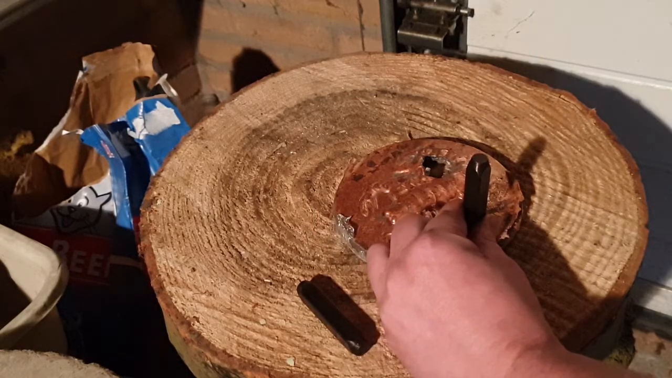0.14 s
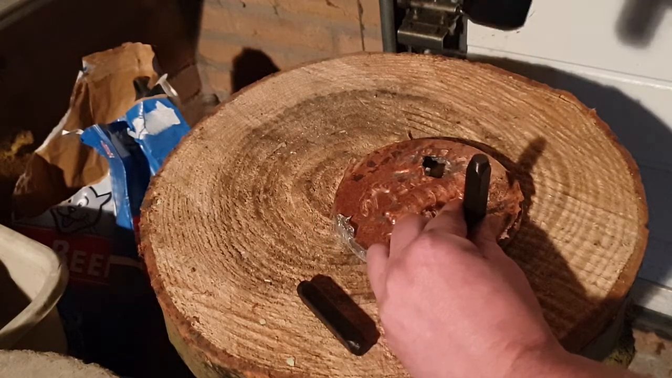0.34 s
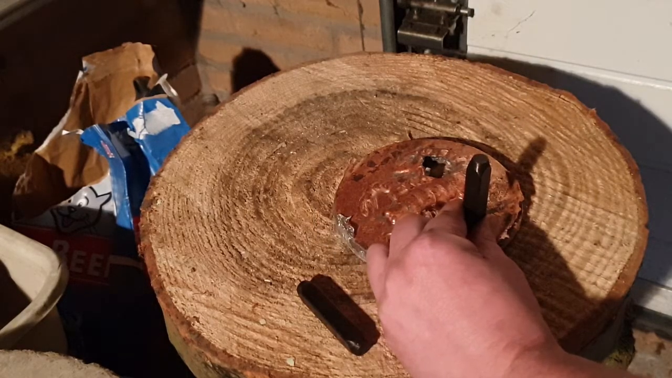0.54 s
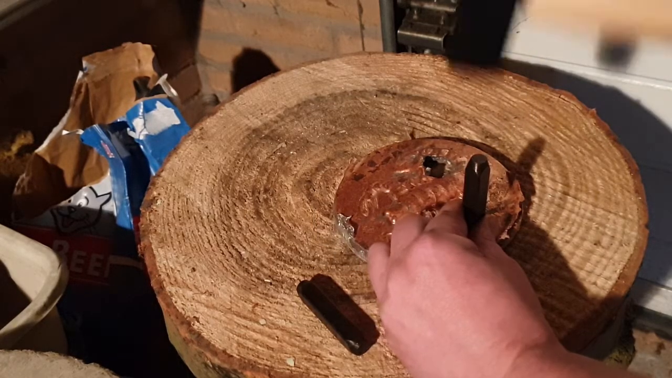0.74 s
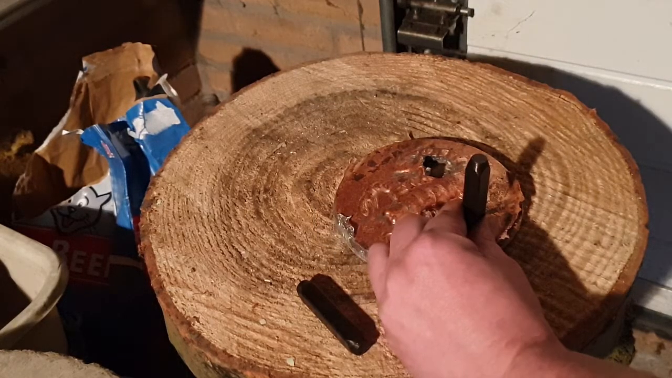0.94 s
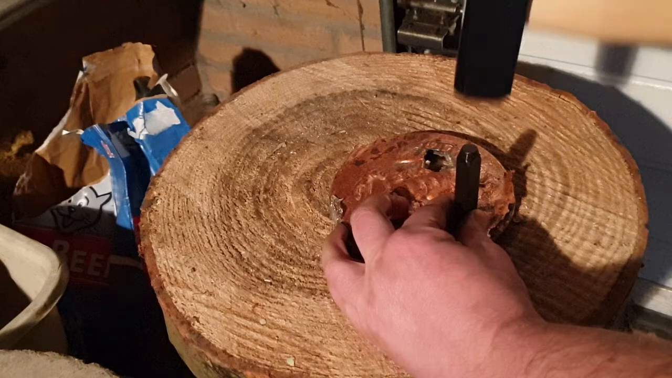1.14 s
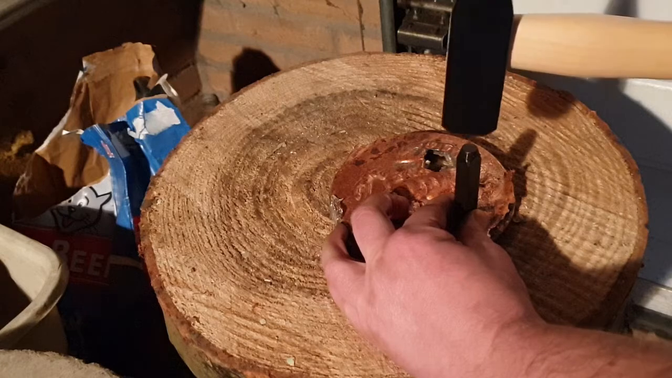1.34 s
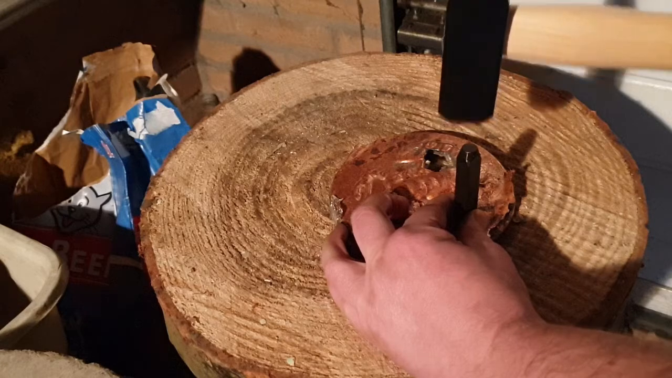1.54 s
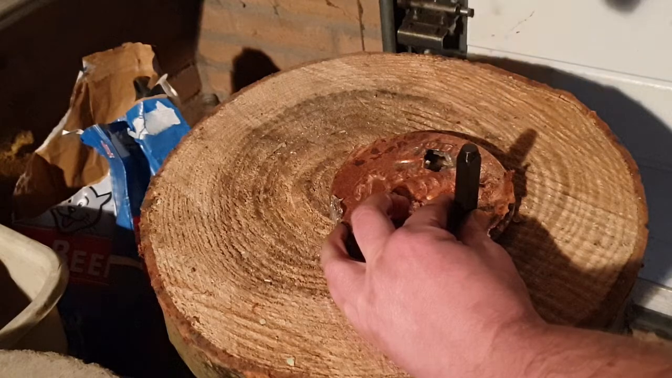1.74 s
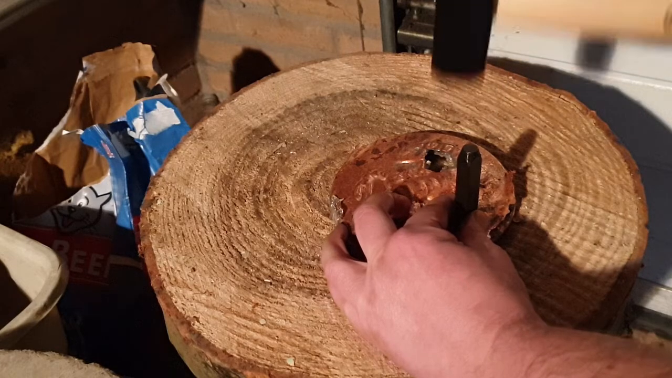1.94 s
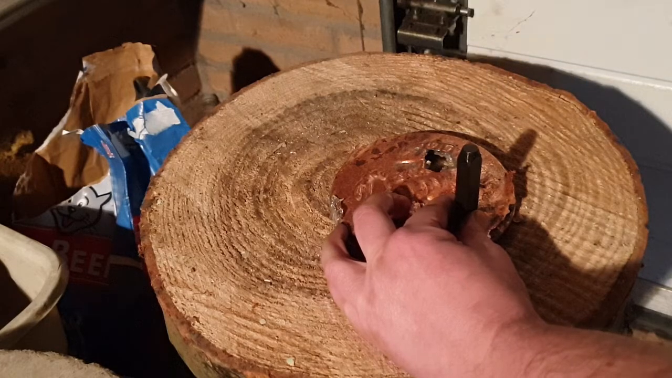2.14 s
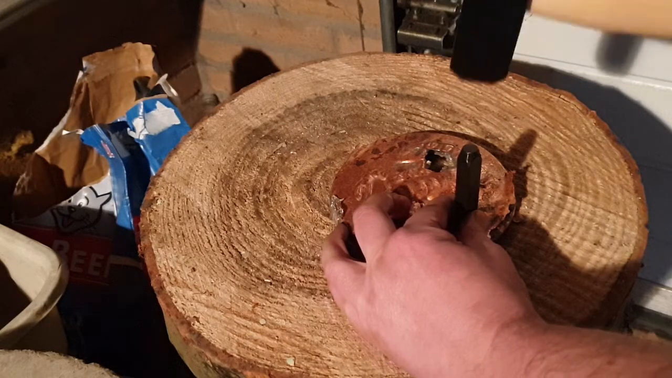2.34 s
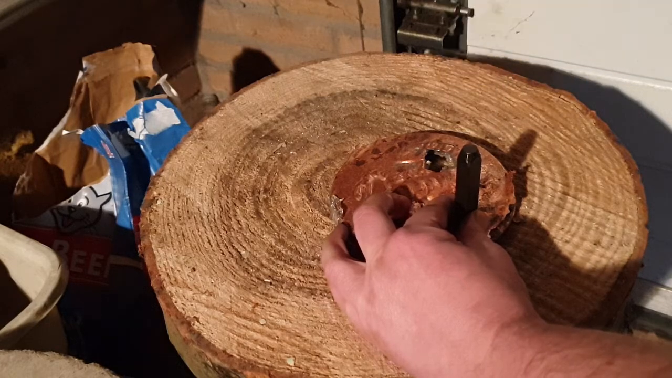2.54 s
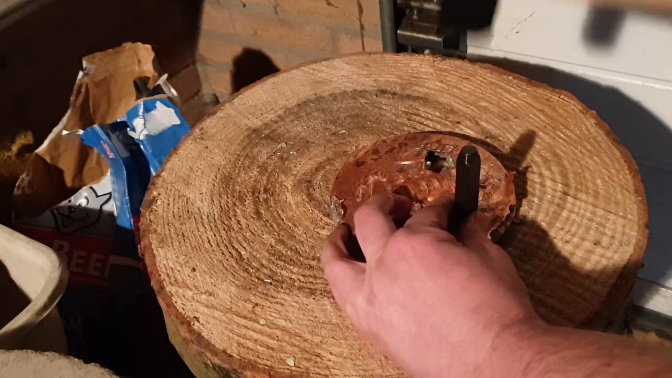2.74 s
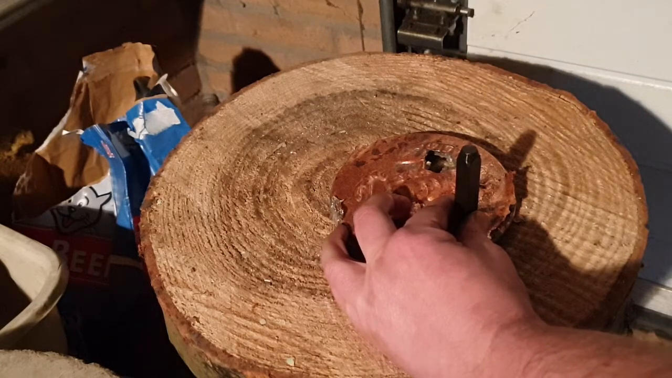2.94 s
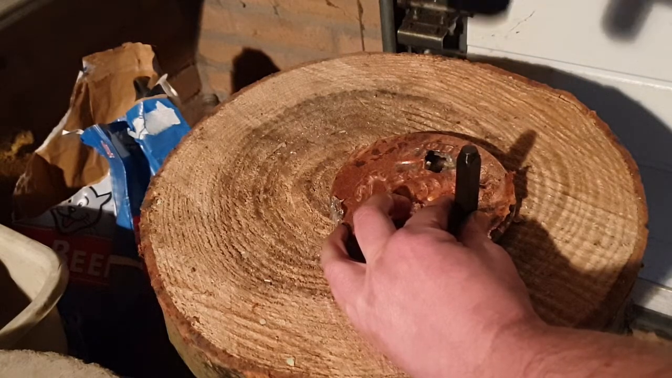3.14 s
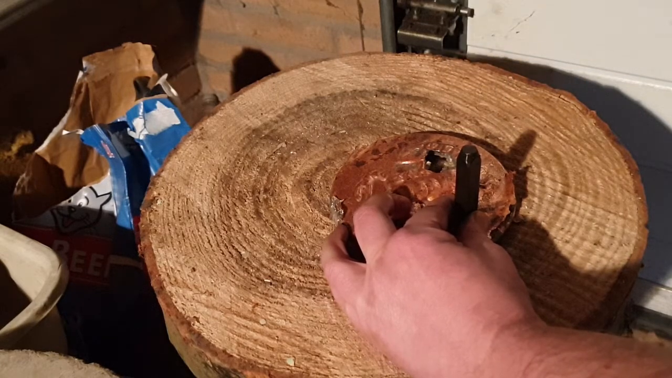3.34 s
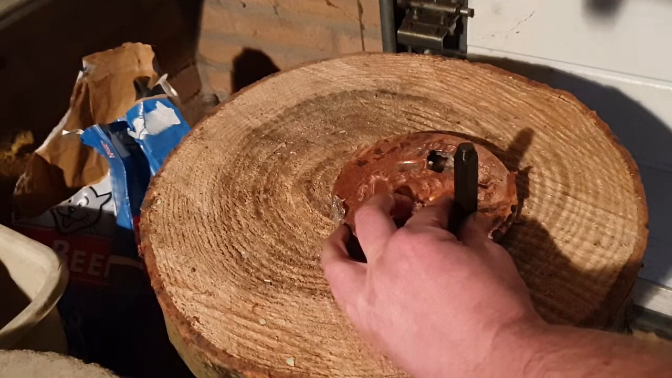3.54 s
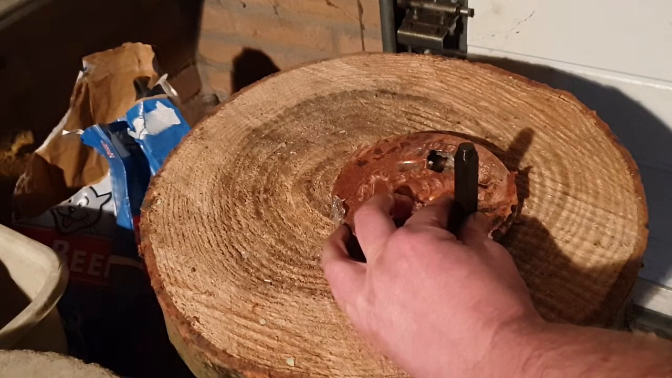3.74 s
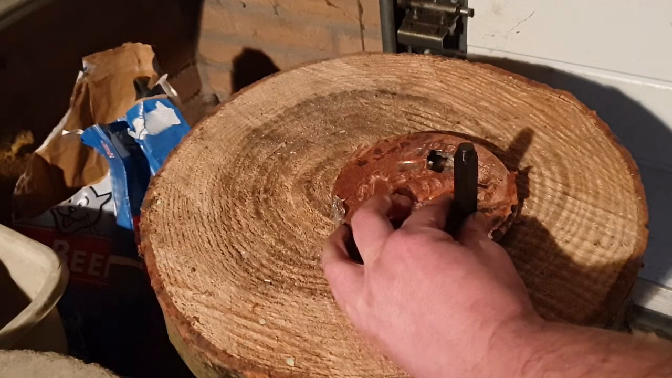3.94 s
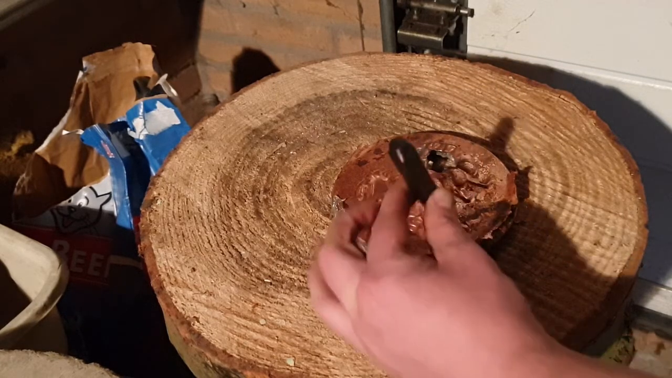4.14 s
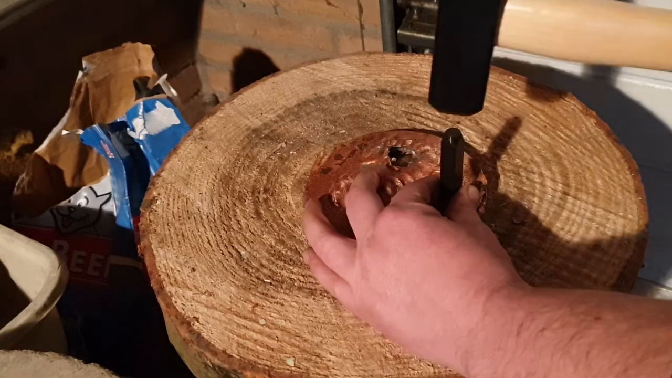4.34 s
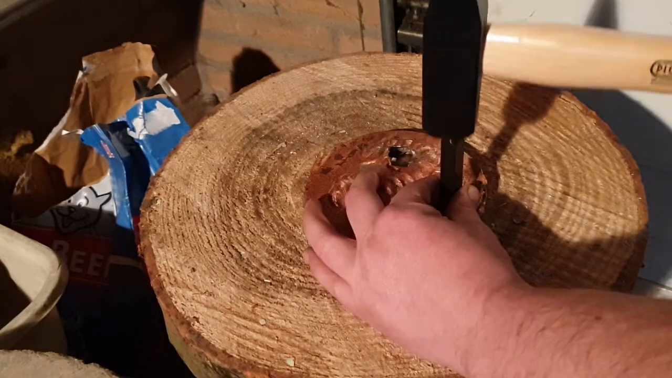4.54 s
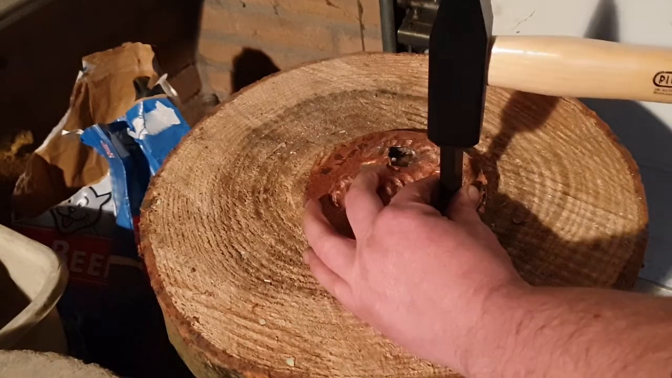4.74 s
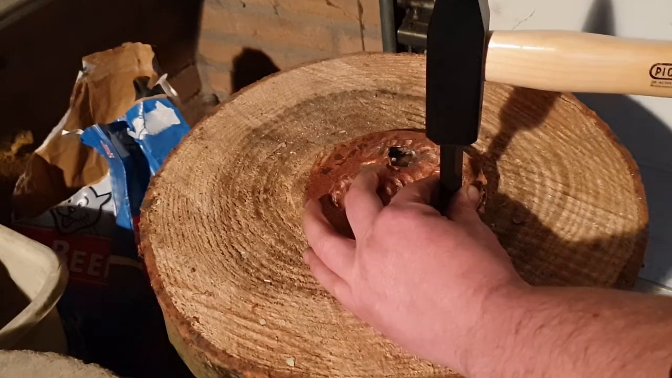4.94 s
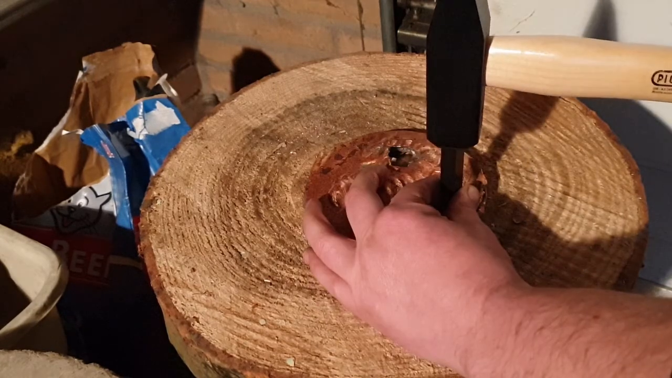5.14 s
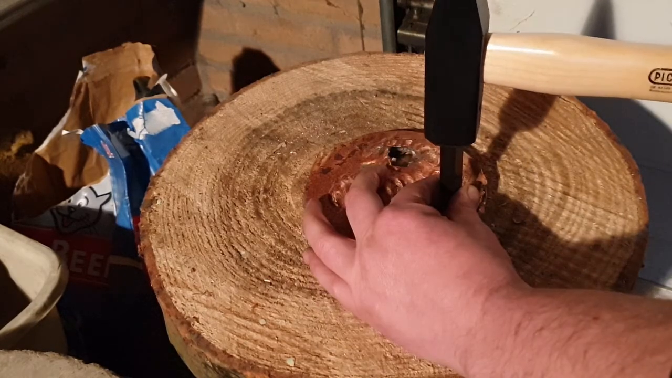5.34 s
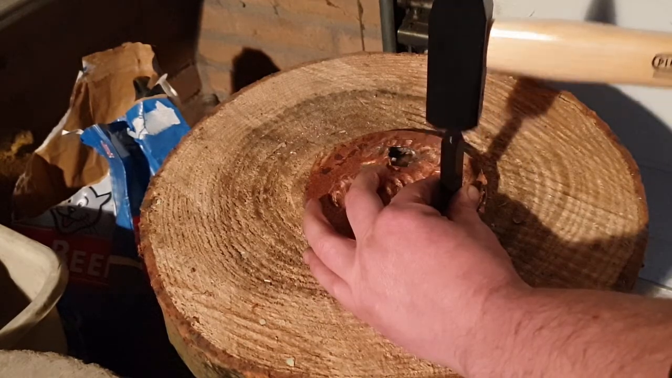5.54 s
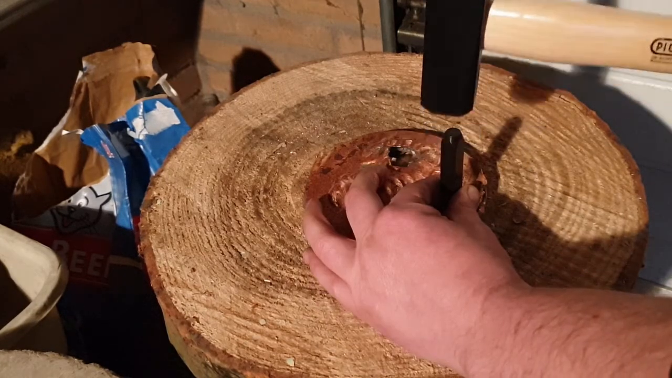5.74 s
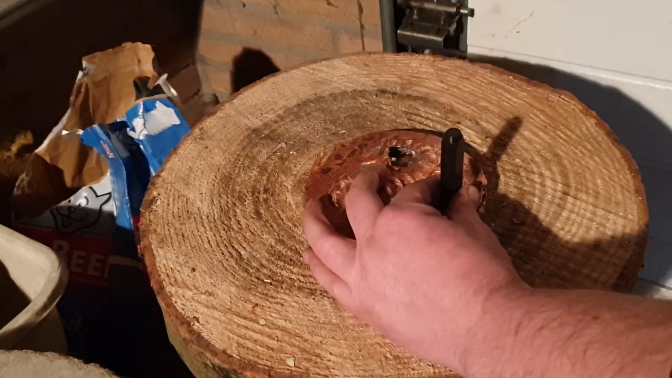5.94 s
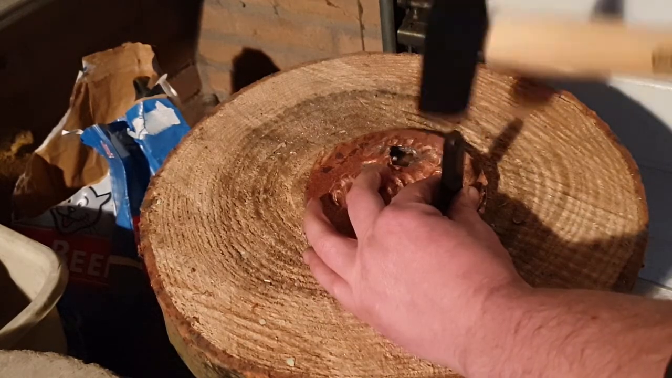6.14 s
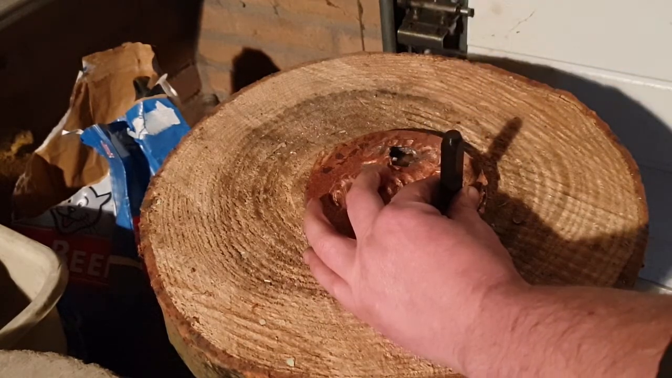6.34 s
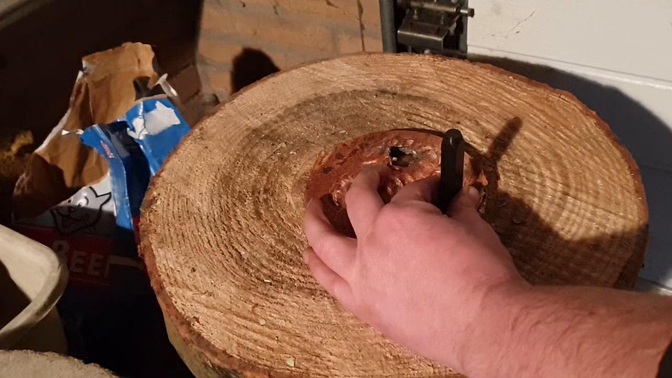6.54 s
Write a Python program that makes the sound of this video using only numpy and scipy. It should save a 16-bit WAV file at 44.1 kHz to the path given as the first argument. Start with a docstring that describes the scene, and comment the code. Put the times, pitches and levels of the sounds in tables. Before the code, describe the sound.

A hammer cracks sharply on a hand-held steel stamp over metal and wood, six spaced blows in a small workshop, with light rubbing between.

```python
"""In a small workshop, a hammer drives a hand-held steel stamp into a metal disc lying on a tree stump.
Each blow is a hard click for the crack, dying tones for the steel and the block, and a low thump;
dense, fading noise makes the echoes of the close walls.
Between blows the hand shifts the work: shaped noise makes the rubs, short clicks the ticks and knocks,
and a few dying tones a last clink. Quiet noise is the still air."""
import sys
import numpy as np
from scipy import signal
from scipy.fft import rfft, irfft
from scipy.io import wavfile
from scipy.ndimage import uniform_filter1d

SR = 44100
rng = np.random.default_rng(int(sys.argv[2]) if len(sys.argv) > 2 else 0)


def dump(signal):
    """Clip the signal to [-1, 1] and save it as 16-bit WAV at the path in sys.argv[1]."""
    limited = np.clip(np.atleast_2d(signal).T, -1, 1)
    pcm = np.round(limited * 32767).astype(np.int16)
    wavfile.write(sys.argv[1], SR, pcm)


N = 294147

# Hammer blows; the first is already dying away, and the light one is followed by its bounce:
# (time [s], force [dB], treble [dB], low ring [dB], middle ring [dB], thump pitch [Hz])
BLOWS = [(-0.126, 13, 0, -6.5, 1.5, 57.9), (0.7829, 10, -3.5, -10, 0, 56), (1.95, 11, -5.5, 0.5, -6.5, 92),
         (2.7395, 13, -3.5, -1, -1, 78.8), (3.53, 12, -3, 0.5, 4.5, 70.2), (4.6946, 8, -9, -31, -10, 123.4),
         (4.729, -3.5, -34, -32, -33, 168), (6.2168, 10.5, -2, -7.5, 3, 92.83)]
# Colour of the crack of steel on steel: (frequency [Hz], relative level [dB per Hz])
CRACK_COLOUR = [(30, -26), (85, 5), (170, -2.5), (400, -2), (700, -2.5), (1050, -0.5), (1600, -1.5),
                (2400, -1.5), (4200, -1), (6200, -9.5), (8500, -7.5), (11500, 0.5), (14000, -0.5),
                (16000, -19)]
# Colour of the disc slapping the wood, damped at once: (frequency [Hz], relative level [dB per Hz])
DISC_COLOUR = [(60, -28), (400, -20.5), (700, -7.5), (930, 4.5), (1200, -3.5), (1500, -4), (2000, -8),
               (2600, -21.5), (3300, -9.5), (4200, -29.5), (8000, -41.5), (16000, -58)]
# Modes (natural tones) of stamp and hammer head: low ring, middle ring, then the high ones: (frequency [Hz])
STEEL_HZ = [2528, 5288, 6600, 6750, 7740, 8600, 8885, 10490, 10700, 11700, 11920, 12070, 13300, 13770]
# Those modes, damped by the fingers: (relative strength [dB], time to fall by 60 dB [s])
STEEL_MODES = [(-7, 0.081), (-10, 0.083), (-21, 0.051), (-21.5, 0.022), (-21, 0.095), (-21, 0.064),
               (-15.5, 0.013), (-18.5, 0.044), (-15, 0.023), (-18, .025), (-21, 0.048), (-21.5, 0.045),
               (-25.5, .025), (-28, .035)]
# Modes of the block, the disc on it and the low notes of the room: (frequency [Hz])
BLOCK_HZ = [54, 76, 91, 137, 204, 232, 307, 516, 571, 603, 897, 973, 1047, 1115, 1217, 1646, 1982]
# Those modes: (relative strength [dB], time to fall by 60 dB [s])
BLOCK_MODES = [(-4.5, 0.58), (-5.5, 0.59), (-4, 0.1), (-3, 0.31), (-6, 0.3), (-2, .41), (-6.5, 0.2),
               (-6, 0.18), (-20, 0.57), (-0.5, 0.16), (-6, 0.21), (-2, 0.16), (-4, 0.17), (-2, .26),
               (-5.5, 0.31), (-1.5, .2), (-7.5, 0.29)]

# A blow is full from FULL_DB of force upwards and a mere tap from TAP_DB downwards.
FULL_DB, TAP_DB = 9, 7.5
# Slap of the disc, relative to the crack: (full blow [dB], tap [dB])
DISC_SLAP_DB = (-13.5, 1)
# Strength of the high steel modes: (full blow [dB], tap [dB])
HIGH_RING_DB = (2, 0)
# Strength of the ringing block: (full blow [dB], tap [dB])
BLOCK_RING_DB = (-5, -14)
# Strength of the wall echoes: (full blow [dB], tap [dB])
ECHO_DB = (7, -5.5)
# Thump level at THUMP_HZ, the same whatever the force of the blow, and its change per octave upwards
THUMP_DB, THUMP_HZ, THUMP_DB_PER_OCTAVE = 4.5, 80, -10

# Pushes of the hand on the work, all levels relative:
# (start [s], length [s], pressure [dB], top sliding speed [dB], rocking of the block [dB])
PUSHES = [(1.102, 0.21, 0, 0.5, -6), (1.314, 0.38, -4, -13, 0), (1.62, 0.6, -3.5, -12, -3.5),
          (4.15, 0.32, -26, -6.5, -27), (4.301, 0.052, -9, -7, 1.5), (4.396, 0.27, -7.5, -0.5, 6),
          (4.924, 0.25, -9, -9, -8), (5.142, 0.28, -11.5, -4.5, -5.5), (5.379, 0.51, -6.5, -5.5, -2.5),
          (5.778, 0.59, -8.5, -6.5, -2), (5.857, 0.22, -3, -3.5, -27)]
PUSH_RISE_S, PUSH_FADE_S = 0.023, 0.029
SCUFF_PER_PRESSURE, SCUFF_PER_SPEED = 2.4, 0.17  # dB of scuffing per dB of each
# Colour of the rocking block: (frequency [Hz], relative level [dB per Hz])
ROCKING_COLOUR = [(20, -10.5), (55, 6), (85, 0), (130, -14.5), (250, -48.5)]
# Colour of rubbing skin: (frequency [Hz], relative level [dB per Hz])
RUBBING_COLOUR = [(70, -22.5), (150, 5), (210, 5.5), (300, 1), (420, -16.5), (900, -43)]
# Colour of scuffing wood: (frequency [Hz], relative level [dB per Hz])
SCUFFING_COLOUR = [(200, -17.5), (340, 2), (490, -3.5), (600, -6.5), (800, -29), (1500, -47)]
# Colour of scraping grit: (frequency [Hz], relative level [dB per Hz])
SCRAPING_COLOUR = [(300, -18.5), (600, 3), (850, 1), (1200, -4.5), (1800, -7.5), (2600, -11.5),
                   (6500, -22.5), (9500, -16), (15000, -17.5)]

# The stamp's tip catching hard on the disc: (time [s], level before a shared lift [dB])
TICKS = [(1.466, -59.5), (1.687, -53.5), (5.224, -61.5), (5.26, -59.5), (5.759, -58), (5.899, -53),
         (5.92, -54)]
# Colour of such a tick: (frequency [Hz], relative level [dB per Hz])
TICK_COLOUR = [(100, 4), (500, 14), (1200, -2.5), (2500, -6), (6000, -15.5), (10000, -23), (15000, -28)]
# Chance catches while the hand pushes: how often, and their typical level at full pressure
CATCHES_PER_S, CATCH_DB = 16, -47
# Soft knocks of the disc settling: (time [s], level [dB])
KNOCKS = [(0.3735, -31.5), (0.387, -47)]
# Colour of such a knock: (frequency [Hz], relative level [dB per Hz])
KNOCK_COLOUR = [(30, -5.5), (90, 1.5), (200, -7), (500, -18), (1500, -29), (3500, -37.5), (8000, -53)]
# A last small clink of steel: its time and level, then its modes
CLINK_S, CLINK_DB = 6.643, -47.5
# (frequency [Hz], relative strength [dB], time to fall by 60 dB [s])
CLINK_MODES = [(1270, -7, 0.024), (2410, -8.5, 0.043), (4270, 6.5, 0.058), (6930, 1, 0.037),
               (10850, 0.5, .04), (12100, 5, .04)]

# How long the echoes last: (frequency [Hz], time to fall by 60 dB [s])
ROOM_DECAY = [(60, 0.49), (120, 0.56), (250, 0.39), (500, 0.3), (1000, 0.29), (2500, 0.28), (5000, .25),
              (8000, .225), (14000, 0.15)]
# How alike the two microphones hear a sound: (frequency [Hz], likeness [1 = identical])
LIKENESS = [(30, 0.97), (130, 0.93), (300, 1), (600, 0.47), (1200, 0.027), (3000, 0.31), (15000, 0.2)]
# Bands of the blows heard more on one side: (frequency [Hz], left minus right [dB])
LEAN = [(40, 1), (90, -0.5), (160, 1), (270, -2), (500, -1.5), (1200, 1.5), (2500, -1), (5200, 3),
        (8800, 1.5), (12000, -1)]
# Colour of the still workshop air: (frequency [Hz], relative level [dB per Hz])
AIR_COLOUR = [(20, -22), (40, -1.5), (60, 1), (100, -13), (200, -22), (400, -30), (1000, -38.5),
              (2500, -47.5), (7000, -55.5), (13000, -45.5), (16000, -50)]
AIR_DB = -67.5
EDGE_HZ = 16400  # upper limit of the microphones


def hammer(walls, near_db=-2, near_ring_db=-8, moved=0.29):
    """A blow cracks, rings the steel and thuds the block; a tap gets more of the disc's slap."""
    out = np.zeros((2, N))
    block_ring = block()
    for time_s, force_db, treble_db, low_db, middle_db, thump_hz in BLOWS:
        lightness = np.clip((FULL_DB - force_db) / (FULL_DB - TAP_DB), 0, 1)
        slap_db, high_db, block_db, echo_db = (
            full + lightness * (tap - full)
            for full, tap in (DISC_SLAP_DB, HIGH_RING_DB, BLOCK_RING_DB, ECHO_DB))
        thump_db = THUMP_DB + THUMP_DB_PER_OCTAVE * np.log2(thump_hz / THUMP_HZ)

        rings = steel(low_db, middle_db, high_db)
        crack = click(CRACK_COLOUR, treble_db) + amp(slap_db) * click(DISC_COLOUR)
        crack = np.pad(crack, (0, SR - len(crack)))

        # the moving arm changes part of the echoes
        echoes = np.sqrt(1 - moved) * walls + np.sqrt(moved) * reflections()
        # the upright stamp rings sideways, so its tone comes mostly by way of the walls
        near_source = crack + amp(near_ring_db) * rings
        near = signal.fftconvolve(near_source[None], near_path(), axes=1)
        far = signal.fftconvolve((crack + rings)[None], room(echoes), axes=1)

        sound = (amp(near_db) * near + amp(echo_db) * far)[:, :SR]
        sound = sound + amp(block_db) * block_ring
        add(out, time_s, amp(force_db) * sound + amp(force_db * 0 + thump_db) * thump(thump_hz))
    return out


def click(colour, treble_db=0, corner_hz=2000, top_hz=13000, size=4096):
    """A hit as a click that starts at once; softer, longer contact loses treble, most at the top."""
    hz = abs(np.fft.fftfreq(size, 1 / SR))
    above_corner = hz ** 4 / (hz ** 4 + corner_hz ** 4)
    very_top = np.minimum(hz / top_hz, 1) ** 8
    gain = evened(amp(read(colour, hz))) * amp(treble_db * (above_corner + very_top))
    # minimum phase: the energy comes as early as this colour allows
    return np.fft.ifft(np.exp(np.conj(signal.hilbert(np.log(gain))))).real


def steel(low_db, middle_db, high_db, detune=0.0006, split=0.0019):
    """Grip and contact set how strongly modes speak; steel bends two ways, so each is a beating pair."""
    count = len(STEEL_MODES)
    group_db = [low_db, middle_db] + [high_db] * (count - 2)
    drift, turns = rng.standard_normal(count), rng.random(count)
    out = np.zeros(SR)
    for hz, (db, t60), extra_db, shift, turn in zip(STEEL_HZ, STEEL_MODES, group_db, drift, turns):
        for way in (-1, 1):
            mode_hz = hz * (1 + detune * shift + way * split)
            out += amp(db + extra_db) * ring(mode_hz, t60, 2 * np.pi * turn) / 2
    return out


def block(swell_s=0.016):
    """The block's modes swell just after the blow and reach each microphone in their own phase."""
    out = np.zeros((2, SR))
    for hz, (db, t60), turn in zip(BLOCK_HZ, BLOCK_MODES, rng.random(len(BLOCK_MODES))):
        apart = np.arccos(likeness(hz)) / 2 * rng.choice([-1, 1])
        pair = [ring(hz, t60, 2 * np.pi * turn + side * apart) for side in (-1, 1)]
        out += amp(db) * np.array(pair)
    return out * (1 - np.exp(-np.arange(SR) / SR / swell_s))


def thump(hz, t60=0.2, apart_hz=62):
    """The whole block dips on the floor; a deeper thump puts the two microphones more out of step."""
    apart = np.minimum(apart_hz / hz, 1) ** 2
    pair = np.array([ring(hz, t60, np.pi + side * apart) for side in (1, -1)])
    return pair * (1 - np.exp(-np.arange(SR) / SR * hz))


def near_path(scatter_s=0.00042, scatter_db=1, corner_hz=1800, mirror=0.74):
    """The straight path, then glances off hammer, hand and disc, too small to turn back the bass."""
    glances = rng.standard_normal((2, SR)) * np.exp(-np.arange(SR) / SR / scatter_s)
    glances = signal.lfilter(*signal.butter(1, corner_hz, "highpass", fs=SR), glances)
    path = amp(scatter_db) * glances / np.linalg.norm(glances, axis=1, keepdims=True)
    path[:, 0] += 1
    # the face of the stump mirrors it all after 6.5 cm more of travel, at 343 m/s
    lag = round(0.065 / 343 * SR)
    return path + mirror * np.roll(path, lag, axis=1)


def leaning(x):
    """Tips each band towards the left or the right microphone."""
    half_db = read(LEAN, np.fft.rfftfreq(2 * N, 1 / SR)) / 2
    return irfft(rfft(x, 2 * N) * amp([half_db, -half_db]))[:, :N]


def shifting(rock_db=-56, rub_db=-60.5, scuff_db=-60.5, scrape_db=-68):
    """The block rocks, skin rubs with pressure, grit scrapes with speed, wood scuffs with both."""
    layers = [amp(rock_db) * noise(ROCKING_COLOUR),
              amp(rub_db) * noise(RUBBING_COLOUR, grain_db=-1.0),
              amp(scuff_db) * noise(SCUFFING_COLOUR, grain_db=2.0),
              amp(scrape_db) * noise(SCRAPING_COLOUR, grain_db=3.0, size=150)]
    power = np.zeros((len(layers), N))
    for start, length, press_db, speed_db, rocking_db in PUSHES:
        grip = pushing(start, length)
        drag_db = SCUFF_PER_PRESSURE * press_db + SCUFF_PER_SPEED * speed_db
        # overlapping pushes add as power
        power += np.square([amp(rocking_db) * grip,
                            amp(press_db) * grip,
                            amp(drag_db) * grip,
                            amp(speed_db) * sliding(start, length)])
    return sum(layer * gain for layer, gain in zip(layers, np.sqrt(power)))


def pushing(start, length):
    """The grip of one push over time: it takes hold, holds and lets go."""
    t = np.arange(N) / SR - start
    return np.clip(t / PUSH_RISE_S, 0, 1) * np.exp(-np.maximum(t - length, 0) / PUSH_FADE_S)


def sliding(start, length, overrun=1.2, skew=0.68):
    """The speed of one push: the disc gathers speed quickly and coasts to rest, in one leaning arch."""
    share = np.clip((np.arange(N) / SR - start) / (length * overrun), 0, 1)
    return np.sin(np.pi * share ** skew)


def small_contacts(walls, tick_db=17, room_db=-6):
    """Ticks of the stamp's tip, knocks of the disc and a clink, with a little of the room."""
    slips = catches()[None]
    for time_s, db in TICKS:
        add(slips, time_s, amp([[db + tick_db]]))
    tick = signal.fftconvolve(click(TICK_COLOUR)[None], near_path(), axes=1)
    out = signal.fftconvolve(slips, tick, axes=1)[:, :N]
    for time_s, db in KNOCKS:
        add(out, time_s, amp(db) * click(KNOCK_COLOUR)[None])
    clink = sum(amp(CLINK_DB + db) * ring(hz, t60) for hz, db, t60 in CLINK_MODES)
    add(out, CLINK_S, clink[None])
    return out + amp(room_db) * signal.fftconvolve(out, room(walls), axes=1)[:, :N]


def catches(spread_db=3):
    """Light catches of the tip at random moments, stronger the harder the hand presses."""
    pressure = np.max([amp(press_db) * pushing(start, length)
                       for start, length, press_db, _, _ in PUSHES], axis=0)
    strength = amp(CATCH_DB + spread_db * rng.standard_normal(N))
    return pressure * (rng.random(N) < CATCHES_PER_S / SR) * strength


def reflections(uneven_db=-0.5):
    """One second of dense wall echoes, slightly uneven in strength from moment to moment."""
    clumps = evened(uniform_filter1d(rng.standard_normal(SR), size=50))
    return paired(rng.standard_normal((2, SR))) * amp(uneven_db * clumps)


def room(echoes, build_s=0.003, first=0.83, size=140):
    """The echoes build up briefly, then each band dies at its own speed."""
    hz, t, bands = signal.stft(echoes, SR, nperseg=256)
    fading = bands * amp(-60 * t / read(ROOM_DECAY, hz)[:, None])
    tail = signal.istft(fading, SR, nperseg=256)[1][:, :SR]
    build = 1 - (1 - first) * np.exp(-np.arange(SR) / SR / build_s)
    spectrum = rfft(tail * build, 2 * SR)
    # level the spectrum so that no stretch of pitch is favoured
    return irfft(spectrum / np.sqrt(uniform_filter1d(abs(spectrum) ** 2, size=size)))[:, :SR]


def still_air():
    """The quiet air of the workshop: coloured noise that wavers slowly in strength."""
    return amp(AIR_DB) * noise(AIR_COLOUR, grain_db=1.5, size=4000)


def noise(colour, grain_db=0, size=300):
    """Coloured stereo noise whose strength varies from grain to grain (size in samples)."""
    grains = evened(uniform_filter1d(rng.standard_normal(N), size=size))
    white = paired(rng.standard_normal((2, N))) * amp(grain_db * grains)
    gain = amp(read(colour, np.fft.rfftfreq(N, 1 / SR)))
    return evened(irfft(rfft(white) * gain, N))


def paired(two):
    """Mixes two unrelated signals into a microphone pair that is as alike as LIKENESS says."""
    a, b = rfft(two)
    same = likeness(np.fft.rfftfreq(two.shape[1], 1 / SR))
    mid = a * np.sqrt((1 + same) / 2)
    side = b * np.sqrt((1 - same) / 2)
    return irfft(np.array([mid + side, mid - side]), two.shape[1])


def likeness(hz):
    """How alike the two microphones are at a frequency."""
    return np.clip(read(LIKENESS, hz), -1, 1)


def ring(hz, t60, phase=0):
    """One dying tone of unit energy that falls by 60 dB in t60 seconds."""
    t = np.arange(SR) / SR
    wave = np.sin(2 * np.pi * hz * t + phase) * np.exp(-np.log(1000) * t / t60)
    return wave / np.linalg.norm(wave)


def amp(db):
    """Turns decibels into a gain."""
    return 10 ** (np.asarray(db) / 20)


def evened(x):
    """Scales to an average strength (rms) of one."""
    return x / np.sqrt(np.mean(x ** 2) + 1e-20)


def read(points, hz):
    """Reads between the points of a table, along a log-frequency axis."""
    f, value = np.transpose(points)
    return np.interp(np.log(hz + 1), np.log(f + 1), value)


def add(mix, time_s, sound):
    """Mixes a sound in at a time; whatever falls outside the mix is cut off."""
    at = round(time_s * SR)
    sound = sound[:, max(-at, 0):]
    part = mix[:, max(at, 0):][:, :sound.shape[1]]
    part += sound[:, :part.shape[1]]


def scene():
    """Blows and small contacts share one small room, over the rubbing and the still air."""
    walls = reflections()
    return leaning(hammer(walls)) + shifting() + small_contacts(walls) + still_air()


def record(dry):
    """The microphones drop the deepest bass, round off the loudest cracks and limit the treble."""
    ceiling = 0.68
    picked = signal.sosfilt(signal.butter(2, 33, "highpass", fs=SR, output="sos"), dry)
    held = picked / (1 + (picked / ceiling) ** 4) ** (1 / 4)
    lowpass = signal.firwin(255, EDGE_HZ, window=("kaiser", 9), fs=SR)
    return signal.oaconvolve(held, lowpass[None], "same", axes=1)


dry = scene()
out = record(dry)
dump(out)
```